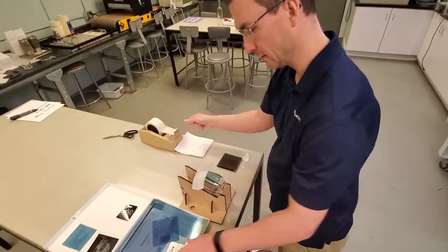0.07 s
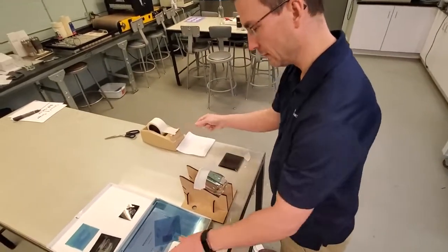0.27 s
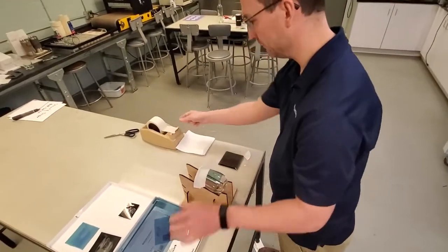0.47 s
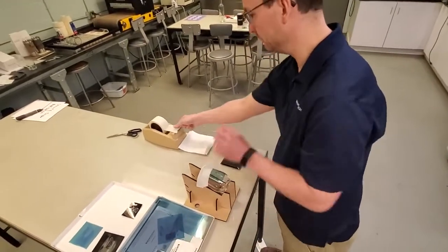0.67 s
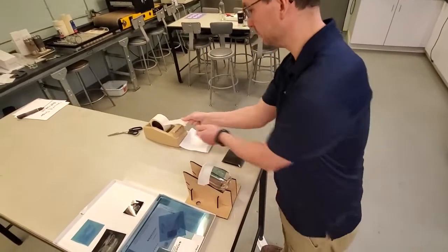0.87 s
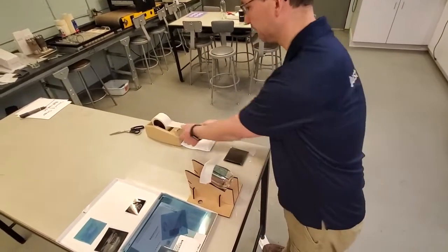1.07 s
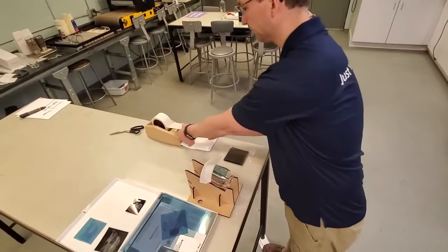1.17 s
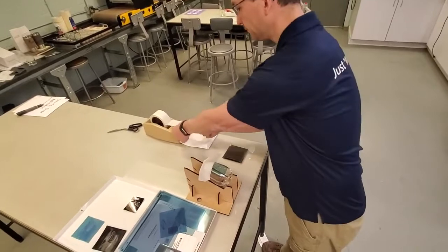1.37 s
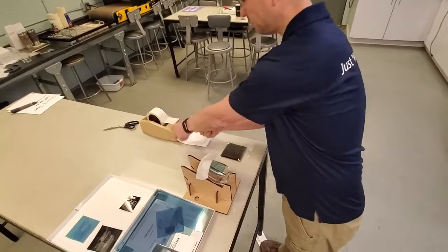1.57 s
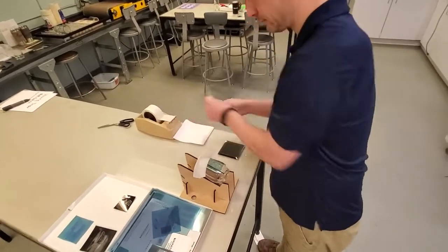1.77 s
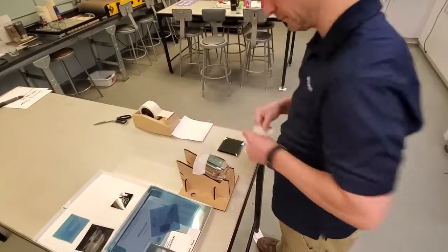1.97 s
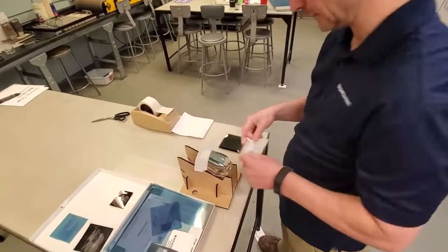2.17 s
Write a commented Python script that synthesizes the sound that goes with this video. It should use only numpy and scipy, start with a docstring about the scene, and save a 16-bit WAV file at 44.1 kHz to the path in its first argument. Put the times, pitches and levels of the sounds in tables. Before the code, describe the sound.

Sticky tape is pulled from a desk dispenser in a workshop with low hum and ventilation. At about 0.7 seconds the roll judders, then peels with a crackling hiss until 1.1. Light finger knocks start near 1.3. At 1.5 the tape tears off with a sharp crack and a soft low thud. From 1.7 to 2.2 the loose strip crinkles, with faint sleeve rustle and a short room echo.

```python
"""Mains hum and ventilation fill a workshop, and a faint hiss dies away. Sticky tape is pulled from a
heavy desk dispenser: the roll judders as it sticks and slips, then the glue lets go in tiny snaps.
Sleeves rustle and fingers knock the dispenser. The tape touches the toothed blade and cracks apart,
the blade rings and the dispenser rocks back. Last, the loose strip crinkles in the fingers.
The table and the hard walls echo each of these moves."""
import sys
import numpy as np
from scipy import signal
from scipy.fft import rfft, irfft, next_fast_len
from scipy.io import wavfile
from scipy.ndimage import map_coordinates

SR = 44100
rng = np.random.default_rng(int(sys.argv[2]) if len(sys.argv) > 2 else 0)


def unload_wav(signal):
    """Save mono or channel-first audio to the path in sys.argv[1] as 16-bit WAV at rate SR, clipped to [-1, 1]."""
    wavfile.write(
        sys.argv[1],
        SR,
        np.round(np.clip(np.atleast_2d(signal).T, -1, 1) * 32767).astype(np.int16),
    )


N = 97637
T = np.arange(N) / SR
SIZE = next_fast_len(N, True)
HZ = np.maximum(np.arange(SIZE + 1) * SR / (2 * SIZE), 1)  # the frequencies that the filters work on
LEFT_RIGHT = np.array([[1], [-1]])  # plus on the left, minus on the right

# steady tones of the hum (f/Hz, level/dB)
HUM_TONES = [(59.2, -50.5), (118.9, -55.5), (145.3, -84), (301.5, -75), (360.7, -119)]
# colour of the ventilation: how strong its low and high parts are next to each other (f/Hz, level/dB)
VENT_COLOUR = [(25, -11.5), (50, 4), (75, 5), (100, -4), (140, 3), (185, -12), (315, -15.5), (400, -24.5),
               (630, -38.5), (1050, -45), (1700, -29), (2600, -43.5), (4200, -45.5), (5500, -38),
               (8200, -38), (10000, -53), (16000, -50)]
# colour of the faint opening hiss (f/Hz, level/dB)
HISS_COLOUR = [(290, -32), (500, 5.5), (586, 1), (1190, -13), (1570, 4), (1740, -4.5), (2390, -8),
               (3340, -0.5), (4470, -10), (5630, -2.5), (6700, -17.5), (14200, -26), (16000, -52)]
# how the rustle of sleeves and fingers swells and fades (t/s, level/dB)
RUSTLE_LEVELS = [(1.15, -68), (1.35, -66), (1.65, -56), (1.75, -63), (1.88, -60.5), (2.05, -47.5),
                 (2.22, -87)]
# colour of the rustle (f/Hz, level/dB)
RUSTLE_COLOUR = [(100, 11.5), (300, -5.5), (520, 6), (900, -12), (1500, -5), (4000, 0.5), (8000, -7),
                 (16000, -15)]
# finger knocks on the dispenser (t/s, level/dB)
KNOCKS = [(1.294, -48), (1.356, -47.5), (1.402, -40), (1.466, -46), (1.640, -55), (1.656, -36.5),
          (1.675, -41.5), (1.827, -49)]
# colour of a knock (f/Hz, level/dB)
KNOCK_COLOUR = [(150, 10.5), (400, -3.5), (560, 10), (880, 6.5), (1200, -1), (2000, 3.5), (4000, -3.5),
                (8000, -11.5), (16000, -17)]
# crinkles of the loose strip (t/s, level/dB, decay/s)
CRINKLES = [(1.713, -47, 0.0016), (1.772, -41, 0.0015), (1.923, -44, .0015), (1.928, -33, 0.0019),
            (1.996, -40.5, 0.0012), (2.005, -26.5, 0.0017), (2.011, -33.5, 0.0064), (2.023, -37, 0.0025),
            (2.095, -41.5, .002), (2.122, -39, 0.0009), (2.134, -45.5, 0.0056), (2.143, -31, 0.0027),
            (2.153, -29.5, 0.0056), (2.159, -26, 0.0039), (2.164, -37, 0.0013)]
# colour of a crinkle (f/Hz, level/dB)
CRINKLE_COLOUR = [(150, -47), (250, -5.5), (748, -2), (890, -7.5), (1670, -7.5), (2570, -2), (6250, 2.5),
                  (12300, -7), (14900, -2.5), (16000, -13)]
# how often and how hard the roll slips (t/s, f/Hz, level/dB)
ROLL_SLIPS = [(.64, 127, -62.5), (.661, 127.4, -38), (.695, 159.6, -34), (.732, 176, -33.5),
              (.752, 108, -28), (.795, 110, -35.5), (.83, 155, -42.5), (.94, 160, -59), (1.08, 216, -58.5),
              (1.12, 150, -62)]
# ringing tones of dispenser and table top; t60 is the time to fade by 60 dB (f/Hz, t60/s, level/dB)
BODY_TONES = [(165.6, 0.077, -0.5), (213, 0.085, 0), (283, 0.14, -5), (327, 0.068, -2), (476, .06, -16.5),
              (650, 0.077, -10), (813, 0.048, -1)]
# ringing tones of the roll's plastic hub (f/Hz, t60/s, level/dB)
HUB_TONES = [(1500, .012, 0), (2050, .01, -3), (3450, .007, -1), (4080, .006, -6), (5600, .006, 1),
             (6380, .009, 1)]
# colour of the rasp on the hub (f/Hz, level/dB)
RASP_COLOUR = [(300, -8), (1100, -21), (1450, 1), (6500, 0), (9000, -11), (16000, -6)]
# ticks as the tape is laid on the blade (t/s, level/dB)
BLADE_TOUCHES = [(1.4004, -45), (1.468, -61), (1.475, -43.5)]
# colour of the tape ripping (f/Hz, level/dB)
CUT_COLOUR = [(150, -17), (350, -23.5), (700, -10.5), (905, -5.5), (1170, -19), (1600, -9), (2600, -6),
              (3550, -4), (6390, -0.5), (7320, -18.5), (9440, -8.5), (14500, -17), (16000, -12)]
# ringing tones of the blade and its holder (f/Hz, t60/s, level/dB)
BLADE_TONES = [(1475, 0.055, -0.5), (1720, 0.013, 7.5), (1970, 0.037, -6), (4300, 0.0057, 0),
               (6460, 0.0083, 12.5), (8770, 0.0053, 6.5), (11800, 0.007, -12)]
# strength of the peeling (t/s, level/dB)
PEEL_LEVELS = [(.70, -79), (.735, -52.5), (.774, -42.5), (.782, -25), (.802, -30.5), (.809, -21),
               (.83, -27), (.86, -27), (.94, -27.5), (1.05, -30), (1.078, -34.5), (1.083, -68),
               (1.0985, -40), (1.1, -27.5), (1.105, -32.5), (1.108, -44.5), (1.117, -42), (1.125, -65)]
# colour of the snapping glue (f/Hz, level/dB)
PEEL_COLOUR = [(59, -40), (100, -4), (163, -11), (266, -21), (308, -12.5), (442, -14), (950, -5.5),
               (1420, -13.5), (1580, -5), (6560, 0), (10700, -4.5), (13500, -3.5), (16000, -9)]
# how long the room echoes, from bass to treble (f/Hz, t60/s)
ROOM_T60 = [(125, 0.32), (500, 0.44), (2000, 0.33), (4500, 0.35), (9000, 0.24), (16000, 0.23)]
# how much louder the left microphone is than the right (f/Hz, level/dB)
MIC_BALANCE = [(500, 1), (2000, 3.5), (4400, -6), (5700, -2.5), (6700, 0.5), (8100, -2), (9500, 9),
               (11400, -13), (13500, 18), (16000, -27)]

TOP_HZ = 15900  # the treble ends here


def undb(db):
    """Turn decibels into a number to multiply by."""
    return 10 ** (np.asarray(db) / 20)


def unit(x):
    """Scale a signal to an average power of 1."""
    return x / np.sqrt(np.mean(x ** 2) + 1e-20)


def curve(rows, axis=1):
    """Join the values of one table column with straight lines through time."""
    rows = np.array(rows)
    return np.interp(T, rows[:, 0], rows[:, axis])


def loudness(rows, axis=1):
    """Turn a dB column into a volume curve, silent outside the table's times."""
    return undb(curve(rows, axis)) * (T >= rows[0][0]) * (T <= rows[-1][0])


def by_pitch(points, hz):
    """Read between (f/Hz, value) points, with every octave equally wide."""
    points = np.array(points)
    return np.interp(np.log(hz), np.log(points[:, 0]), points[:, 1])


def shape(x, gain):
    """Turn each frequency up or down by its own gain."""
    return irfft(rfft(x, 2 * SIZE) * gain)[..., :N]


def colour(x, points):
    """Give a sound the colour in a table; white noise keeps its power."""
    bass_cut = np.hypot(1, (points[0][0] / HZ / 2) ** 2)
    treble_cut = np.hypot(1, (HZ / TOP_HZ) ** 20)
    gain = unit(undb(by_pitch(points, HZ)) / bass_cut / treble_cut)
    # fold the filter forward in time, so it never rings ahead of a click
    cepstrum = irfft(np.log(gain + 1e-7))
    cepstrum[1:SIZE] *= 2
    cepstrum[SIZE + 1:] = 0
    return shape(x, np.exp(rfft(cepstrum)))


def ring(x, tones):
    """Every push in x sets an object's fading tones ringing."""
    response = sum(undb(db) * np.cos(2 * np.pi * hz * T) * undb(-60 * T / t60) for hz, t60, db in tones)
    return signal.fftconvolve(x, unit(response) / np.sqrt(N))[:N]


def snaps(per_s, spread_db):
    """Tiny snaps of uneven size at random times."""
    size = undb(spread_db * np.minimum(rng.exponential(size=N), 5))
    happens = rng.random(N) < per_s / SR
    return unit(happens * size * rng.choice([-1, 1], N))


def burst(peak_s, attack_s, decay_s):
    """A volume curve that rises quickly to a peak and dies away."""
    return np.exp(np.minimum((T - peak_s) / attack_s, (peak_s - T) / decay_s))


def diffuse(split_hz=1390):
    """Noise from all sides: alike at both microphones in the bass, unrelated in the treble."""
    mid, side = rng.standard_normal((2, N))
    alike = 0.99 / (1 + (HZ / split_hz) ** 2)
    return shape(mid, np.sqrt((1 + alike) / 2)) + LEFT_RIGHT * shape(side, np.sqrt((1 - alike) / 2))


def workshop(x, room_db, table_db, gap_s=0.0042, table_decay_s=0.003):
    """A sound arrives directly, then bounces off the table, then echoes around the walls."""
    noise, walls = diffuse(), 0
    centres = np.log(np.array(ROOM_T60)[:, 0])
    for weights, (_, t60) in zip(np.eye(len(centres)), ROOM_T60):
        band = shape(noise, np.interp(np.log(HZ), centres, weights))
        walls = walls + band * undb(-60 * T / t60)
    walls *= np.clip(T / gap_s - 1, 0, 1)  # the walls answer after a short gap
    table = shape(diffuse(), HZ / np.hypot(HZ, 900)) * T * np.exp(-T / table_decay_s)
    response = (undb(room_db) * unit(walls) + undb(table_db) * unit(table)) / np.sqrt(N)
    response[0, 0] += 1
    response[1, 5] += 1  # the direct sound reaches the right side 5 samples later
    return signal.fftconvolve(x[None], response, axes=1)[:, :N]


def across_tape(source, room_db, table_db, spots=4):
    """Spread a source across the tape's width: each spot has its own paths through the room."""
    return sum(workshop(source(spots), room_db, table_db) for _ in range(spots)) / np.sqrt(spots)


def background(hiss_hold_s=0.12, hiss_fall_db_per_s=70):
    """Steady mains hum and ventilation, with a faint hiss that dies away at the start."""
    hum = sum(undb(db) * np.sqrt(2) * np.sin(2 * np.pi * (hz * T + rng.random())) for hz, db in HUM_TONES)
    hiss_db = -61.5 - hiss_fall_db_per_s * np.maximum(T - hiss_hold_s, 0)
    hiss = undb(hiss_db) * colour(diffuse(), HISS_COLOUR)
    ventilation = undb(-51) * unit(colour(diffuse(), VENT_COLOUR))
    return hum + ventilation + hiss


def rustle():
    """Cloth and skin brush as the arms move."""
    return colour(snaps(per_s=3000, spread_db=2.8) * loudness(RUSTLE_LEVELS), RUSTLE_COLOUR)


def knocks():
    """Fingers bump the dispenser, each time with a short, dull burst of noise."""
    force = sum(undb(db) * burst(s, attack_s=0.00032, decay_s=0.004) for s, db in KNOCKS)
    return colour(force * rng.standard_normal(N), KNOCK_COLOUR)


def crinkles(click_db=12):
    """The strip buckles with a click, then unsticks from the fingers in a small shower of snaps."""
    force = sum(undb(db) * burst(s, attack_s=0.00026, decay_s=decay) for s, db, decay in CRINKLES)
    crackle = force * snaps(per_s=7000, spread_db=1.8)
    for s, db, _ in CRINKLES:
        crackle[int(s * SR)] += undb(db + click_db)
    return colour(crackle, CRINKLE_COLOUR)


def rock(start_s=1.512, hz=89, t60_s=0.2):
    """Freed from the pull, the dispenser rocks back on the table with a low thud."""
    age = np.maximum(T - start_s, 0)
    return undb(-40.5) * np.sin(2 * np.pi * hz * age) * undb(-60 * age / t60_s)


def judder(jitter=0.086, spread_db=4, sway_end_s=0.68):
    """The roll sticks and slips, shaking the dispenser and rasping on its hub."""
    cycles = np.cumsum(curve(ROLL_SLIPS)) / SR  # goes up by one for each slip
    force = loudness(ROLL_SLIPS, axis=2)
    # every slip is a little early or late, and a little weaker or stronger
    timing, strength = rng.standard_normal((N // 100, 2)).T
    slip_at = np.searchsorted(cycles, np.arange(len(timing)) + jitter * timing)
    slips = np.bincount(slip_at, undb(spread_db * strength), N + 1)[:N]
    slips = shape(slips, 1 / (1 + (HZ / 450) ** 4))  # soften the clicks into thumps
    shake = ring(slips * force, BODY_TONES) / np.std(ring(slips, BODY_TONES))
    grit = unit(snaps(per_s=4000, spread_db=2) * np.exp(-(cycles % 1) / 0.69))
    rasp = undb(-16.5) * colour(ring(grit * force, HUB_TONES), RASP_COLOUR)
    # the dispenser sways briefly with the first slips: a short low thump as the pull begins
    swaying = (1 - np.tanh((T - sway_end_s) / 0.0034)) / 2
    sway = undb(-4) * force * np.cos(2 * np.pi * cycles) * swaying
    return shake + sway + rasp


def cut(spots, cut_s=1.4952):
    """At one spot, the tape ticks onto the teeth, then rips across them and the blade rings."""
    pierce = undb(-17) * burst(cut_s, attack_s=0.00086, decay_s=0.0029)
    touches = sum(undb(db) * burst(s, attack_s=0.0002, decay_s=0.0038) for s, db in BLADE_TOUCHES)
    rip = snaps(per_s=16000 / spots, spread_db=0.8) * (pierce + touches)
    return colour(rip, CUT_COLOUR) + undb(-7) * ring(rip, BLADE_TONES)


def peel(spots):
    """At one spot, threads of glue snap as the tape leaves the roll, so fast that they hiss."""
    glue = snaps(per_s=9000 / spots, spread_db=4) * loudness(PEEL_LEVELS)
    # the echo off the growing strip comes later and later, which slides the colour down
    delay_s = 0.000326 + 0.00031 * (T - PEEL_LEVELS[0][0])
    echo = undb(-12.5) * map_coordinates(glue, [(T - delay_s) * SR])
    return colour(glue + echo, PEEL_COLOUR)


def scene(hands_right_db=2.5):
    """The dispenser stands ahead; the strip is handled a little to the right."""
    peeling = across_tape(peel, room_db=-3, table_db=1)
    dispenser = workshop(judder() + rock(), room_db=-10, table_db=-8)
    blade = across_tape(cut, room_db=-4, table_db=-3)
    hands = workshop(knocks() + crinkles() + rustle(), room_db=-8, table_db=-3.5)
    pan = undb(-LEFT_RIGHT * hands_right_db / 2)
    return peeling + dispenser + blade + pan * hands + background()


def record(dry):
    """Each microphone colours the sound its own way, and the highest treble is cut off."""
    heard = shape(dry, undb(LEFT_RIGHT * by_pitch(MIC_BALANCE, HZ) / 2))
    return signal.sosfilt(signal.ellip(10, 0.2, 80, TOP_HZ, fs=SR, output="sos"), heard)


dry = scene()
out = record(dry)
unload_wav(out)
```